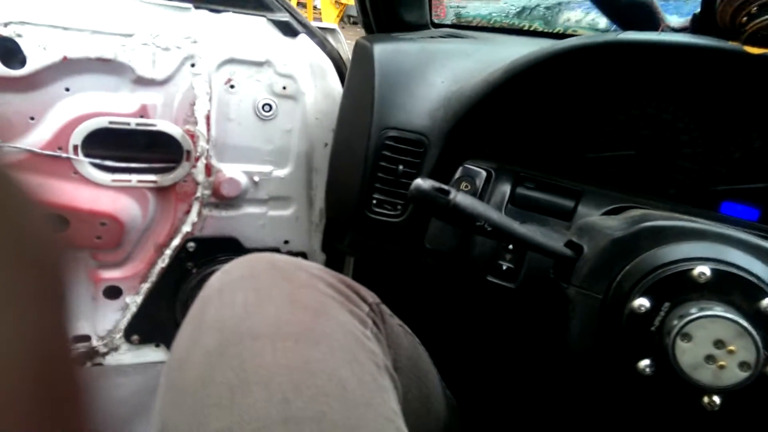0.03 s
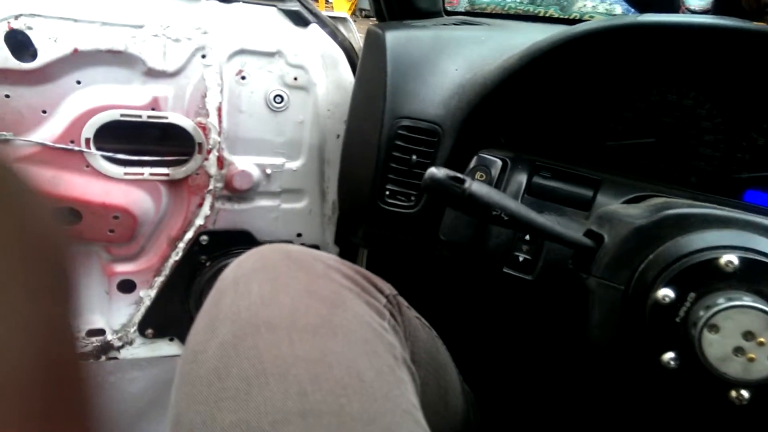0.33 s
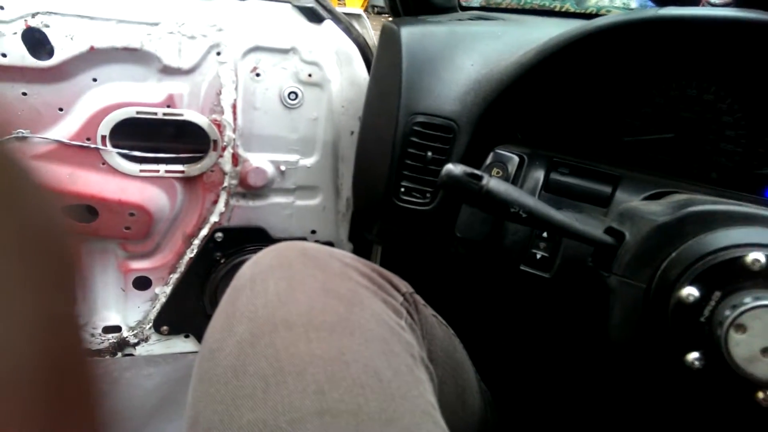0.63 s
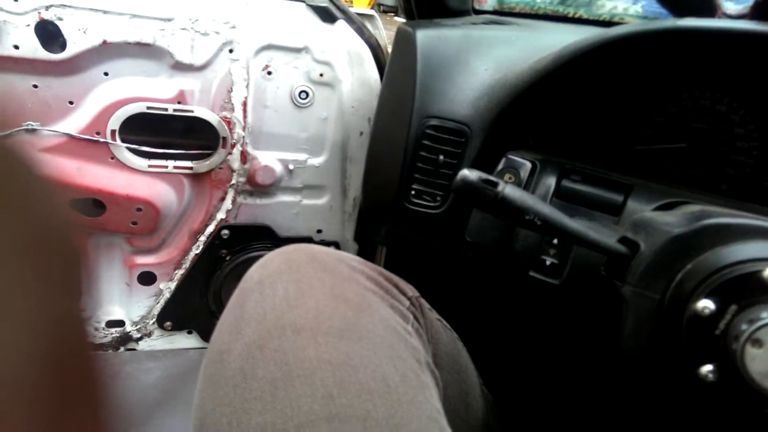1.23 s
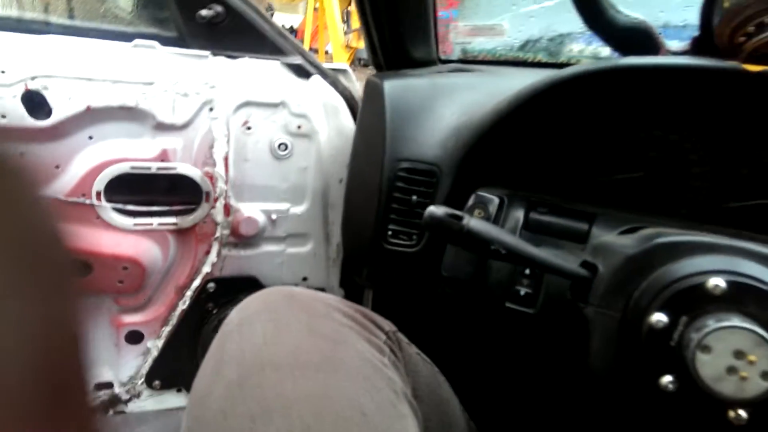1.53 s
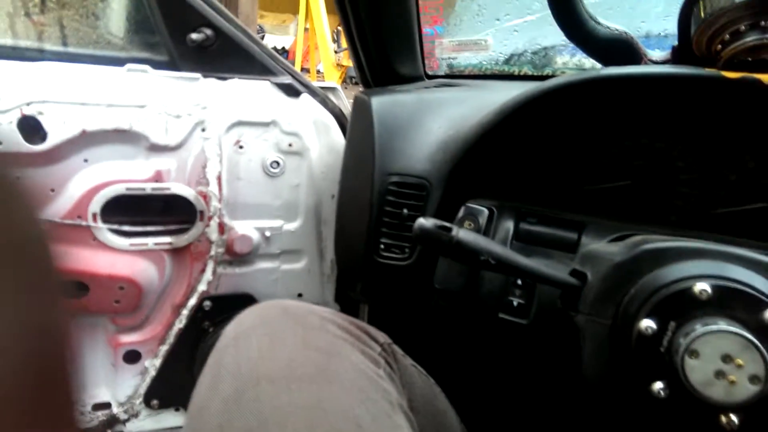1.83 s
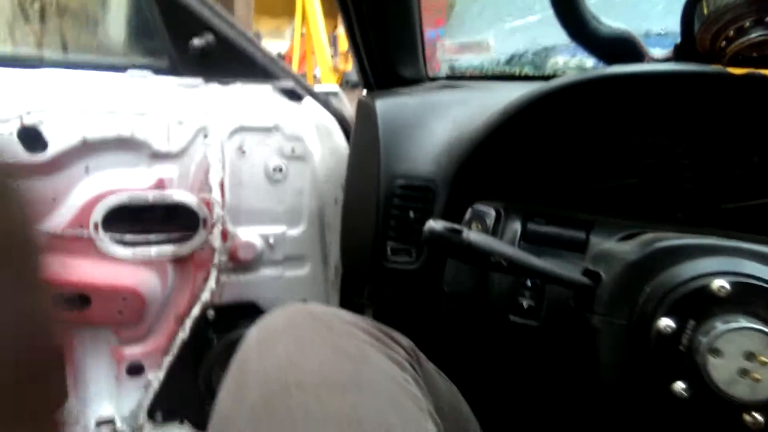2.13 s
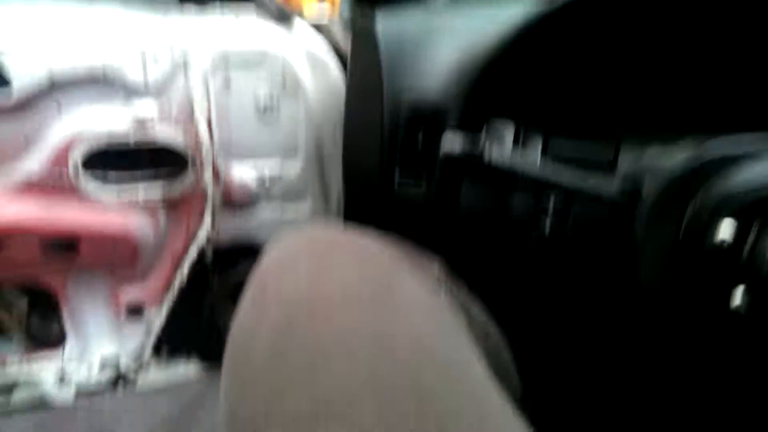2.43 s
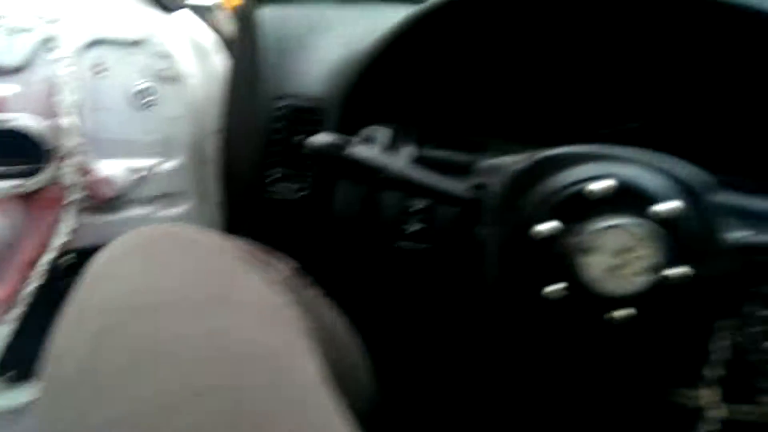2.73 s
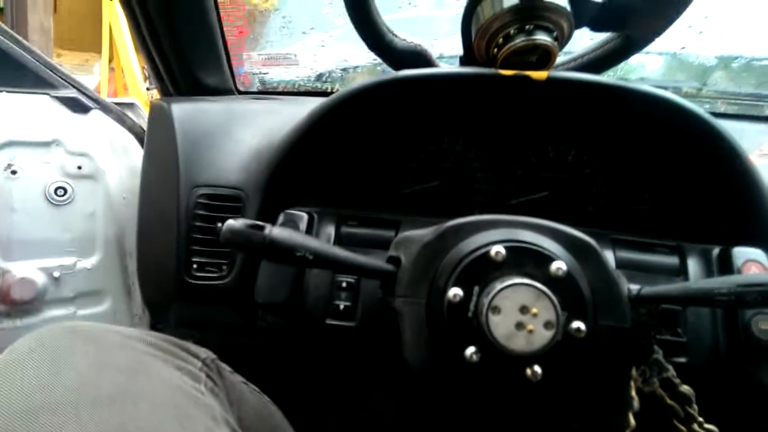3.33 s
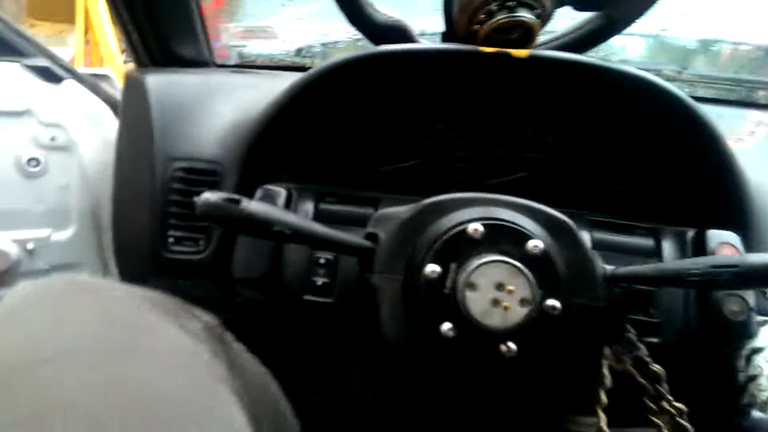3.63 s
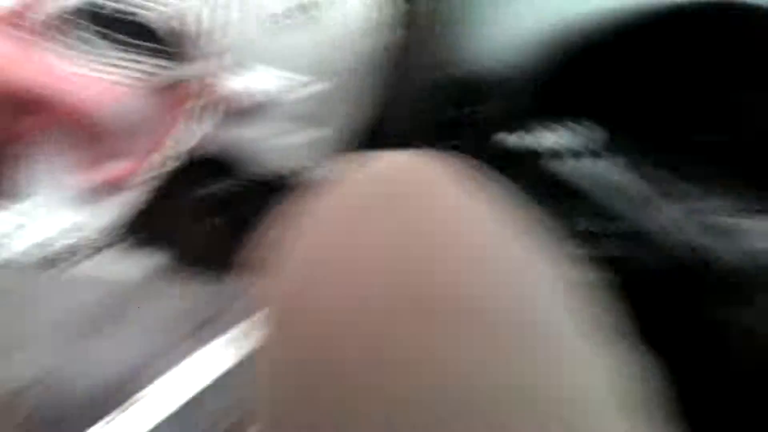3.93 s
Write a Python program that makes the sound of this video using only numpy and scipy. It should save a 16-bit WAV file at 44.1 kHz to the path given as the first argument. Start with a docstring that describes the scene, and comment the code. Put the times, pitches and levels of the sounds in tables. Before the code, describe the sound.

Car engine fires twice, runs down and stalls with clunks, then a few microphone knocks.

```python
"""A four-cylinder engine drones and whirrs, heard from the seat of a stripped car in a garage.
It catches in two short bursts of firing and runs down, its orders sliding through the cabin's
resonances while bare panels ring. As it stalls, the shaking drivetrain clunks against the body.
Then fingers rub and knock on the left microphone, something creaks softly and cloth rustles."""
import sys
import numpy as np
from scipy import signal
from scipy.fft import rfft, irfft
from scipy.io import wavfile

SR = 44100
rng = np.random.default_rng(int(sys.argv[2]) if len(sys.argv) > 2 else 0)


def log_audio(samples):
    """Write samples as a 16-bit WAV file to the path given in sys.argv[1]."""
    # one column per channel
    frames = np.atleast_2d(samples).T
    # limit to full scale, then quantise
    limited = np.clip(frames, -1, 1)
    pcm = np.round(limited * 32767).astype(np.int16)
    wavfile.write(sys.argv[1], SR, pcm)


N = 176400
TIME_S = np.arange(N) / SR
RING_S, SHORT_S = TIME_S[:16384], TIME_S[:4096]  # time axes of single events
BINS_HZ = np.fft.rfftfreq(N, 1 / SR)


def amp(db):
    """Decibels to gain."""
    return 10 ** (np.asarray(db) / 20)


def unit(x):
    """Scales to rms 1."""
    return x / np.sqrt(np.mean(x ** 2) + 1e-20)


def curve(rows, column=1):
    """One column of a time table at every sample."""
    rows = np.array(rows)
    return np.interp(TIME_S, rows[:, 0], rows[:, column])


def at_hz(table, hz):
    """Interpolates on a log-frequency axis."""
    knots_hz, values = np.transpose(table)
    return np.interp(np.log(hz + 1), np.log(knots_hz + 1), values)


def add(mix, start_s, sound):
    """Mixes a sound in at a time."""
    part = mix[:, max(round(start_s * SR), 0):][:, :sound.shape[-1]]
    part += sound[..., :part.shape[1]]


def pan(side_db):
    """Left and right gains for a level difference."""
    return amp(np.array([[.5], [-.5]]) * side_db)


def pan_bands(x, table):
    """Leans a sound left or right by frequency."""
    return irfft(rfft(x) * pan(at_hz(table, BINS_HZ)), N)


# likeness of the two ears (frequency [Hz], coherence [0-1])
COHERENCE = [(60, 1), (150, 0.67), (300, 0.45), (700, 0.29), (1500, 0), (4000, 0), (15000, 0)]

def noise(spectrum, size=N):
    """Coloured stereo noise of rms 1, alike in the bass."""
    hz = np.fft.rfftfreq(size, 1 / SR)
    coherence = np.clip(at_hz(COHERENCE, hz), -1, 1)
    mid, side = rfft(rng.standard_normal((2, size))) * np.sqrt([1 + coherence, 1 - coherence])
    skirts = np.minimum(hz / spectrum[0][0], 1) ** 2 / np.maximum(hz / spectrum[-1][0], 1) ** 2
    return unit(irfft(np.array([mid + side, mid - side]) * amp(at_hz(spectrum, hz)) * skirts, size))


def wander(rate_hz, size=N):
    """Straight glides between random values."""
    knots = rng.standard_normal(512)
    return np.interp(TIME_S[:size] * rate_hz, np.arange(len(knots)), knots)


def burst(spectrum, decays, attack_s):
    """Noise burst in which each band dies at its own speed."""
    bins = rfft(noise(spectrum, len(RING_S)))
    hz = np.fft.rfftfreq(len(RING_S), 1 / SR)
    centres_hz, t60s = np.transpose(decays)
    out = 0
    for t60_s, weights in zip(t60s, np.eye(len(decays))):
        band = at_hz(list(zip(centres_hz, weights)), hz)
        out += irfft(bins * band) * amp(-60 * RING_S / t60_s)
    return out * np.minimum(RING_S / attack_s, 1)


def ring(modes, detune):
    """Damped modes, struck a little differently each time."""
    out = 0
    for hz, db, t60_s in modes:
        gain, stretch = 1 + rng.standard_normal(2) * (.023, detune)
        out += gain * amp(db - 60 * RING_S / t60_s) * np.sin(2 * np.pi * hz * stretch * RING_S)
    return out


# crankshaft (time [s], speed [turns/s])
CRANK_SPEED = [(0, 39), (.12, 35.6), (.25, 43.4), (.31, 41), (.51, 36.5), (.66, 38.5), (.74, 40.4),
               (.81, 37.3), (.96, 34.7), (1.08, 31.6), (1.306, 25.6), (1.5, 21.7), (1.756, 17),
               (1.86, 15.6), (2.2, 11.7), (2.7, 8.4)]
# drone envelope (time [s], level [dB])
DRONE_LEVEL = [(0, -8), (.09, -9), (.13, -16.5), (.25, -25), (.28, -10), (.49, -8), (.53, -15), (.65, -27),
               (.69, -8), (.95, -10), (1.15, -9), (1.45, -13.5), (1.74, -13.5), (1.95, -15.5), (2.3, -26.5),
               (2.7, -25), (2.85, -38), (3.1, -51)]
# engine orders (multiple of crank speed [1], level [dB])
ORDERS = [(1, -41.5), (1.5, -42), (2, 0.5), (2.5, -10), (3, -10.5), (3.5, -33), (4, -5), (4.5, -16),
          (5, -14), (5.5, -23.5), (6, -9), (6.5, -16), (7, -27.5), (7.5, -16.5), (8, -10.5), (9, -16),
          (10, -33.5), (11, -14), (12, -23), (14, -20), (16, -20)]
# cabin response (frequency [Hz], gain [dB])
CABIN_RESPONSE = [(18, -18.5), (30, -17), (36, -9), (46, -6.5), (60, -5.5), (74, -0.5), (85, 0), (98, -8.5),
                  (108, -2.5), (119, 1.5), (135, -5), (152, -9.5), (172, -4.5), (200, 4), (235, -7),
                  (265, -15.5), (295, -25), (335, -16), (420, -20), (600, -30.5)]

def drone(speed_hz, turns, waver_depth=.11, chug_depth=.18, shake_db=-21):
    """Whole orders line up into chugs, rougher at low speed; the cabin colours them and the shaking."""
    orders = 0
    for order, db in ORDERS:
        scatter_cycles = rng.random() * (1 if order % 1 else .35)
        lag_cycles = .55 * np.log2(order)  # delay in the cabin
        waver = waver_depth * wander(13) * (.2 if order == 2 else 1)
        phase = 2 * np.pi * (order * turns + scatter_cycles - lag_cycles) + waver
        orders += amp(db + at_hz(CABIN_RESPONSE, order * speed_hz)) * (1 + waver) * np.cos(phase)
    unevenness = 1 + chug_depth * (1 - speed_hz / speed_hz.max()) * wander(45)
    shake = amp(shake_db) * noise(CABIN_RESPONSE)
    return amp(curve(DRONE_LEVEL)) * (np.sqrt(2) * orders * unevenness + shake)


# panel envelope (time [s], level [dB])
PANEL_ENVELOPE = [(0, -39), (.09, -26), (.14, -15.5), (.25, -22), (.34, -31.5), (.48, -25.5), (.53, -18.5),
                  (.66, -20.5), (.76, -30.5), (.97, -25.5), (1.12, -28), (1.31, -23), (1.45, -30.5),
                  (1.58, -28), (1.9, -38), (2.7, -48), (2.9, -79)]
# panel resonances (frequency [Hz], half-width [Hz], gain [dB])
PANEL_MODES = [(308, 44, -6.5), (337.3, 24, 2.5), (416.6, 11, -7), (477, 5.5, -16.5), (837, 23, -15.5),
               (2350, 92, -40), (2916, 36, -27.5), (3330, 48, -35.5), (3480, 32, -33.5), (5340, 100, -50.5)]

def panels():
    """Bare panels ring at their own pitches while the engine shakes them."""
    response = sum(amp(db) / (1 + ((BINS_HZ - hz) / width_hz) ** 2) for hz, width_hz, db in PANEL_MODES)
    shake = noise([(200, .022), (8000, .029)])
    return amp(curve(PANEL_ENVELOPE)) * unit(irfft(rfft(shake) * response, N))


# whirr envelopes (time [s], mid level [dB], treble level [dB])
WHIRR_LEVELS = [(0, -36.5, -47), (.1, -35, -43.5), (.2, -33.5, -42), (.42, -37, -45), (.6, -33, -42.5),
                (.8, -35.5, -42), (1, -39.5, -48.5), (1.15, -33, -41.5), (1.28, -34, -43),
                (1.38, -36.5, -50.5), (1.52, -41, -57.5), (1.9, -41.5, -63), (2.55, -46, -57.5),
                (2.75, -55.5, -83), (3.1, -72.5, -88), (4, -58, -71)]
# mid band (frequency [Hz], level [dB])
WHIRR_MID_SPECTRUM = [(150, -36.5), (400, -18.5), (600, 2), (850, 0.5), (1100, -4), (1600, -3),
                      (2500, -8.5), (3600, -15), (5000, -25.5)]
# treble band (frequency [Hz], level [dB])
WHIRR_TREBLE_SPECTRUM = [(2500, 0.5), (4000, 3), (5500, -2.5), (7500, -8.5), (10000, -14.5), (14500, -15.5),
                         (16000, -17)]

def whirr(turns, pulse_depth=.11):
    """Valve and belt noise that pulses twice a turn."""
    pulse = unit(1 + pulse_depth * np.cos(2 * np.pi * 2 * turns) + .1 * wander(110))
    mid = amp(curve(WHIRR_LEVELS)) * noise(WHIRR_MID_SPECTRUM)
    treble = amp(curve(WHIRR_LEVELS, column=2)) * noise(WHIRR_TREBLE_SPECTRUM)
    return pulse * (mid + treble)


# garage rumble (frequency [Hz], level [dB])
RUMBLE_SPECTRUM = [(30, 6), (70, -2), (125, 4), (200, -7), (300, -7), (550, -28), (1400, -28.5),
                   (3000, -42.5), (6000, -49.5), (15000, -58)]
# rumble envelope (time [s], level [dB])
RUMBLE_LEVEL = [(0, -39), (2.8, -46.5), (3.2, -39.5), (3.45, -52.5), (3.65, -57.5), (4, -47)]

def background(hiss_db=-68.5):
    """Low garage rumble and steady microphone hiss."""
    rumble = amp(curve(RUMBLE_LEVEL)) * noise(RUMBLE_SPECTRUM)
    return rumble + amp(hiss_db) * noise([(2000, 11.5), (15000, -1)])


# cylinder firings (time [s], level [dB])
FIRING_EVENTS = [(.114, 3), (0.131, 0), (.166, 1), (0.18, -7), (.214, 1.5), (0.231, -5), (0.512, 1.5),
                 (.528, -0.5), (0.567, 1.5), (0.582, -3), (.616, 2.5), (.631, -5)]
# firing crack (frequency [Hz], level [dB])
FIRING_SPECTRUM = [(60, 7.5), (140, -0.5), (240, 3), (360, -30), (520, -18), (900, -17.5), (1800, -21),
                   (3500, -27), (6000, -29.5), (10000, -39.5), (15000, -43)]
# crack decay (frequency [Hz], T60 [s])
FIRING_DECAY = [(100, 0.17), (350, 0.41), (1000, 0.13), (4000, 0.076), (12000, 0.066)]
# low push (frequency [Hz], level [dB], T60 [s])
PUSH_MODES = [(81.8,-9.5,.14), (121,-5,0.064), (251,-15.5,0.1), (334.6,-18.5,0.33), (428,-32,0.14),
              (480,-50,0.21), (810,-31.5,0.11)]

def firings(crack_db=-11.5):
    """Each firing is a low push and a crack through the body."""
    out = np.zeros((2, N))
    for start_s, db in FIRING_EVENTS:
        crack = amp(crack_db) * burst(FIRING_SPECTRUM, FIRING_DECAY, attack_s=.0029)
        push = -ring(PUSH_MODES, detune=.011)
        add(out, start_s, amp(db) * (crack + push))
    return out


# metal zings (time [s], level [dB])
ZING_EVENTS = [(.114, -39), (.166, -33), (.18, -28), (.213, -28), (.511, -47), (.582, -33)]
# loose part (frequency [Hz], level [dB], T60 [s])
METAL_MODES = [(4500, -20, 0.1), (5150, -9.5, 0.04), (5180, -5.5, 0.064), (5730, -22, 0.088),
               (6500, -18, .1)]

def zings():
    """A loose metal part rings along with some firings."""
    out = np.zeros((2, N))
    for start_s, db in ZING_EVENTS:
        add(out, start_s, amp(db) * np.array([ring(METAL_MODES, detune=.0065) for ear in range(2)]))
    return out


# fitting ticks (time [s], level [dB], left-right [dB])
TICK_EVENTS = [(.318, -26, 4), (.758, -28, 7), (0.803, -26, 1.5), (1.581, -35.5, 1.5), (1.655, -31.5, 3),
               (1.839, -41, 3), (2.297, -39, 22), (2.771, -40, 24)]
# tick noise (frequency [Hz], level [dB])
TICK_SPECTRUM = [(300, 16), (1500, 13), (4500, 4.5), (8000, -1), (15000, -19)]

def ticks(decay_s=.0072):
    """Loose fittings tick lightly."""
    out = np.zeros((2, N))
    for start_s, db, side_db in TICK_EVENTS:
        tick = noise(TICK_SPECTRUM, len(SHORT_S)) * np.exp(-SHORT_S / decay_s)
        add(out, start_s, amp(db) * pan(side_db) * tick)
    return out


# drivetrain strikes (time [s], crack [dB], body ring [dB], ring tilt [dB/octave], boom [dB])
CLUNK_EVENTS = [(1.626,-4,-13,4,-24.5), (1.65,-6.5,-11,7,-21.5), (1.674,-4,-4.5,-0.5,-23.5),
                (1.698,-.5,-2.5,-2,-11.5), (1.723,-1.5,-5,2.5,-14), (1.794,-10,-17,6,-20.5),
                (1.822,-7.5,-8,-3,-24.5), (1.841,-5,-13,2,-38), (1.896,-18,-10,-4,-30),
                (1.921,-5.5,-11,1.5,-16), (1.938,-20,-13,-6,-25), (1.991,-0.5,-4,1,-15),
                (2.029,-9,-12.5,1,-19), (2.064,-6,-8.5,-3.5,-16), (2.158,-1,-5.5,2.5,-13.5),
                (2.207,-6,-10.5,-4.5,-27), (2.227,-2,-7,-1.5,-13), (2.325,-3,-6.5,4,-18.5),
                (2.345,-7.5,-7.5,0.5,-22), (2.393,2,3.5,1,-16), (2.411,-2.5,-3,3,-16),
                (2.465,-4,-1.5,0,-31), (2.481,-1.5,2,1,-16.5), (2.496,-2,-3.5,1.5,-13.5),
                (2.592,-0.5,1,2,-24.5), (2.606,-5.5,-1.5,0.5,-33), (2.645,-14.5,-16.5,3,-27),
                (2.808,-12.5,-15.5,-0.5,-31.5), (2.823,-23,-19.5,5,-35), (2.955,-31,-29,4.5,-47.5),
                (3.1,-33,-15.5,0.5,-37), (3.197,-30,-26.5,2,-40.5), (3.297,-35,-29,0,-45)]
# strike crack (frequency [Hz], level [dB])
CLUNK_SPECTRUM = [(80, 5.5), (200, -3), (330, 4.5), (500, -8), (700, -4.5), (900, 4), (1150, -11.5),
                  (1450, -5.5), (2100, -13.5), (3000, -20.5), (5000, -26.5), (8000, -39), (15000, -50.5)]
# crack decay (frequency [Hz], T60 [s])
CLUNK_DECAY = [(100, 0.83), (350, 0.085), (800, 0.072), (2000, 0.092), (5000, 0.13), (12000, 0.12)]
# bare car body (frequency [Hz], level [dB], T60 [s])
SHELL_MODES = [(71.43,-35.5,.5), (119.73,-20.5,0.67), (148.5,-21.5,0.23), (212.7,-33.5,0.39),
               (399.3,-24,0.16), (526,-30.5,0.15), (650.2,-19.5,.13), (707,-32.5,0.15), (818.6,-22,0.091),
               (892,-28.5,0.049), (1020.8,-43,0.13), (1140,-38,0.15), (1333,-34,0.065), (1472,-29.5,0.036),
               (1980,-37.5,0.11), (2310,-45.5,.13), (2840,-49,0.17), (3450,-55,0.31)]
# clunk balance (frequency [Hz], left-right [dB])
CLUNK_PAN = [(60, -4), (300, -4.5), (700, -3), (1300, -0.5), (2400, -6.5), (8000, 3.5)]

def clunks(crack_trim_db=-18.5, pivot_hz=400, boom_hz=291.6, boom_t60_s=.1):
    """The rocking drivetrain strikes with a crack; the body rings and chatters, the floor pan booms."""
    out = np.zeros((2, N))
    snap = 1 + .68 * np.exp(-(RING_S / .0057) ** 2)
    body_swell = 1 - np.exp(-RING_S / .0019)
    boom_swell = 2 * (1 - np.exp(-RING_S / .005)) ** 2
    for start_s, crack_db, ring_db, tilt, boom_db in CLUNK_EVENTS:
        crack = amp(crack_db + crack_trim_db) * burst(CLUNK_SPECTRUM, CLUNK_DECAY, attack_s=.00081)
        boom = ring([(boom_hz, boom_db, boom_t60_s)], detune=.021) * boom_swell
        modes = [(hz, db + tilt * np.log2(hz / pivot_hz), t60_s) for hz, db, t60_s in SHELL_MODES]
        body = amp(ring_db) * ring(modes, detune=.0097) * body_swell
        chatter = 1 + .25 * wander(160, len(RING_S))
        add(out, start_s, crack * snap + body * chatter + boom)
    return pan_bands(out, CLUNK_PAN)


# finger slides (time [s], length [s], level [dB])
RUB_EVENTS = [(2.768, 0.092, -43.5), (2.866, 0.055, -40.5), (2.928, 0.045, -40), (2.984, 0.012, -40),
              (3.125, 0.0078, -24.5), (3.145, 0.0095, -28.5), (3.161, 0.022, -39.5), (3.77, 0.0053, -23.5),
              (3.776, 0.037, -34)]
# friction noise (frequency [Hz], level [dB])
FRICTION_SPECTRUM = [(60, 12.5), (200, 7.5), (600, 3), (1700, 1), (3000, -6.5), (6000, -13.5),
                     (9000, -22.5), (15000, -40)]

def finger_rubs(edge_s=.015, flicker_db=1.6):
    """Skin slides over the microphone's case."""
    envelope = 0
    for start_s, length_s, db in RUB_EVENTS:
        inside_s = np.minimum(TIME_S - start_s, start_s + length_s - TIME_S)
        envelope += amp(db) * np.clip(inside_s / edge_s + .5, 0, 1)
    return envelope * amp(flicker_db * wander(140)) * noise(FRICTION_SPECTRUM)


# creak slips (time [s], pitch [Hz], level [dB], left-right [dB])
SLIP_EVENTS = [(3.032, 376, -47, 26), (3.051, 342, -44, 20), (3.076, 340, -54, 16), (3.179, 300, -32, 10),
               (3.207, 269, -34, 11), (3.26, 343, -41, 19), (3.846, 540, -41, -6), (3.877, 560, -40, -3),
               (3.91, 443, -32, -5), (3.943, 520, -35.5, -4), (3.962, 585, -40, -5), (3.989, 583, -40, -16)]

def creaks(rise_s=.00093, grit=.087):
    """Something creaks in short slips, each a gritty pulse of tone."""
    out = np.zeros((2, N))
    envelope = SHORT_S / rise_s * np.exp(1 - SHORT_S / rise_s)
    for start_s, hz, db, side_db in SLIP_EVENTS:
        slip = np.sin(2 * np.pi * hz * SHORT_S) + grit * noise(FRICTION_SPECTRUM, len(SHORT_S))
        add(out, start_s, amp(db) * pan(side_db) * slip * envelope)
    return out


# finger knocks (time [s], push [dB], scrape [dB])
KNOCK_EVENTS = [(3.108, -0.5, -14), (3.3896, 0, -14), (3.5445, -5.5, -15.5), (3.9925, -17.5, -40)]
# skin scrape (frequency [Hz], level [dB])
SCRAPE_SPECTRUM = [(150, -3), (600, -6.5), (1100, -3), (1550, 2.5), (2500, -10), (3600, -14), (4600, -14),
                   (6000, -21.5), (9000, -30), (15000, -61)]

def finger_knocks(lead_s=.003, press_s=.00033, rebound_hz=110, decay_s=.0051):
    """A finger presses the microphone port shut, it rebounds, and skin scrapes the case."""
    out = np.zeros((2, N))
    t = SHORT_S - lead_s
    after_s = np.maximum(t - press_s, 0)
    press = 1 / np.cosh(np.minimum(abs(t) / press_s, 20))
    rebound = .73 * np.sin(2 * np.pi * rebound_hz * after_s) * np.exp(-after_s / decay_s)
    for time_s, push_db, scrape_db in KNOCK_EVENTS:
        scrape = noise(SCRAPE_SPECTRUM, len(t))[0] * (t > 0) * np.exp(-(after_s / decay_s) ** 1.3)
        add(out, time_s - lead_s, amp(push_db) * (rebound - press) + amp(scrape_db) * scrape)
    return out


# clothing rustles (time [s], level [dB])
RUSTLE_EVENTS = [(3.298, -73), (3.619, -62), (3.699, -51), (3.753, -50), (3.88, -55.5), (3.97, -49)]
# cloth noise (frequency [Hz], level [dB])
CLOTH_SPECTRUM = [(300, 9.5), (700, -1), (1500, 1), (3500, -11), (6000, -22), (12000, -26)]

def rustles(width_s=.01):
    """Cloth rustles in faint, brief swells."""
    envelope = sum(amp(db) * np.exp(-((TIME_S - peak_s) / width_s) ** 2) for peak_s, db in RUSTLE_EVENTS)
    return envelope * noise(CLOTH_SPECTRUM)


# engine balance (frequency [Hz], left-right [dB])
ENGINE_PAN = [(60, -2.5), (200, -1.8), (400, 1), (700, -2), (1300, 6), (2400, 2.5), (4400, 1), (8000, 6.5),
              (15000, -0.5)]

def scene(low_cut_hz=60, right_leak_db=-55):
    """Engine, clunks, small sounds and handling over the garage's rumble."""
    speed_hz = curve(CRANK_SPEED)
    turns = np.cumsum(speed_hz) / SR
    running = drone(speed_hz, turns) + panels() + whirr(turns)
    low_cut = signal.butter(2, low_cut_hz, "high", fs=SR, output="sos")
    catching = signal.sosfilt(low_cut, firings() + zings())
    engine = pan_bands(running + catching, ENGINE_PAN)
    handling = (finger_rubs() + finger_knocks()) * amp([[0], [right_leak_db]])
    return engine + background() + ticks() + clunks() + handling + creaks() + rustles()


def record(dry, knee=.52, headroom=.49, cutoff_hz=15800):
    """Soft overload on the peaks, then a low-pass."""
    held = np.clip(dry, -knee, knee)
    saturated = held + headroom * np.tanh((dry - held) / headroom)
    low_pass = signal.firwin(511, cutoff_hz, window=("kaiser", 9), fs=SR)
    return signal.oaconvolve(saturated, low_pass[None], "same")


dry = scene()
out = record(dry)
log_audio(out)
```